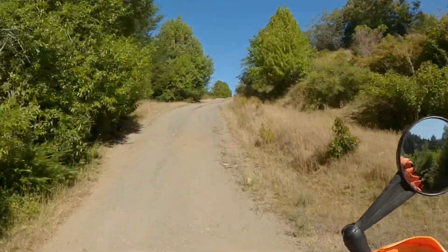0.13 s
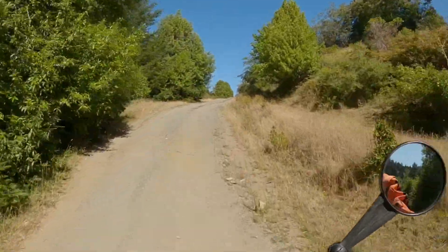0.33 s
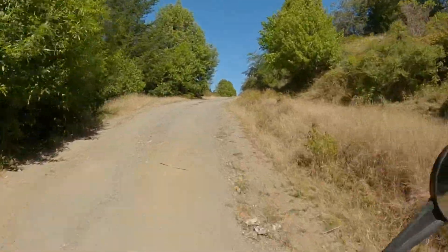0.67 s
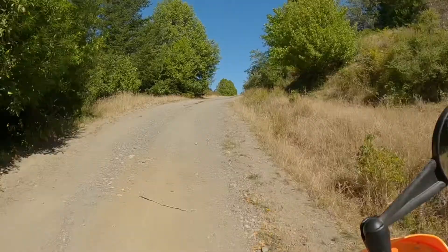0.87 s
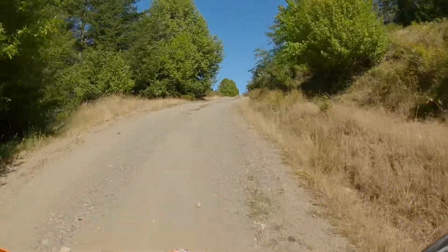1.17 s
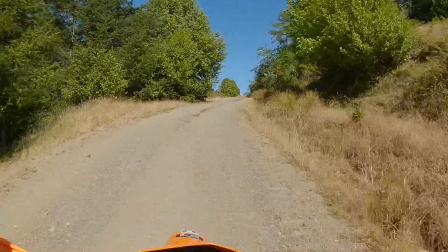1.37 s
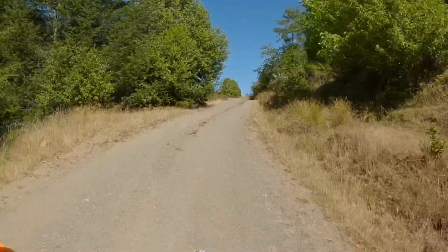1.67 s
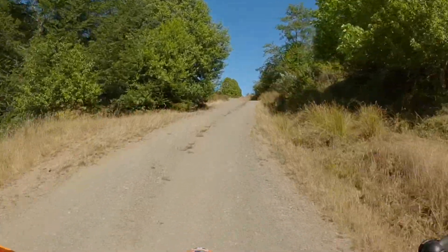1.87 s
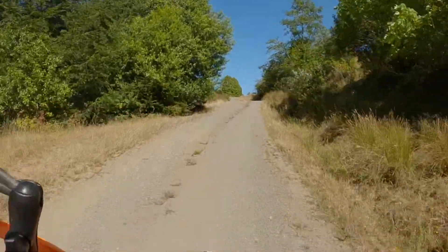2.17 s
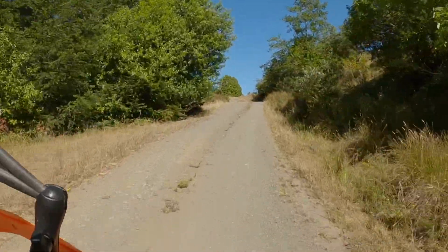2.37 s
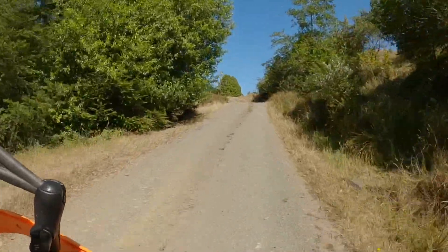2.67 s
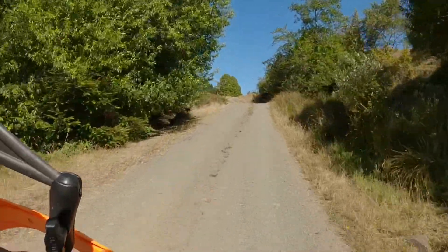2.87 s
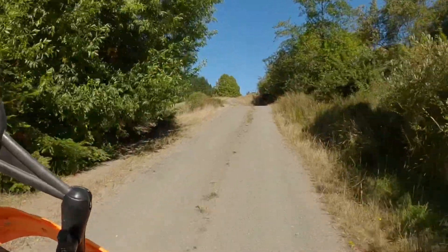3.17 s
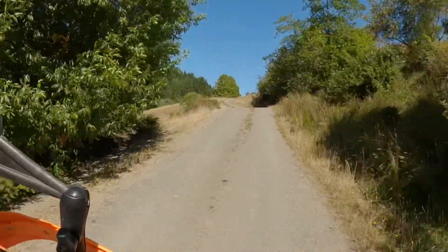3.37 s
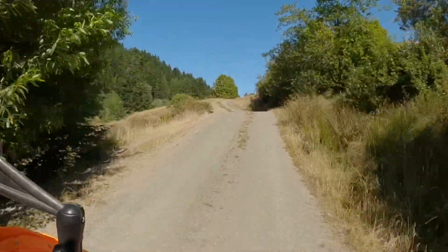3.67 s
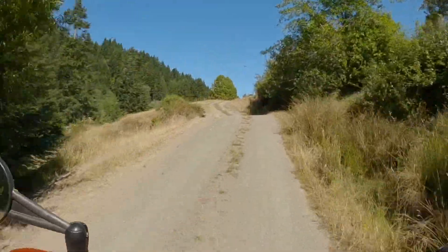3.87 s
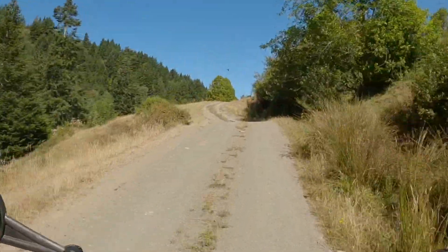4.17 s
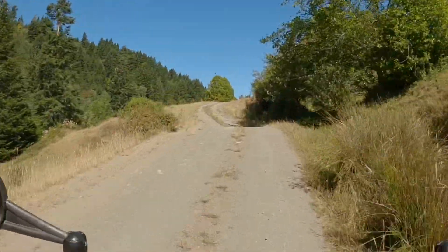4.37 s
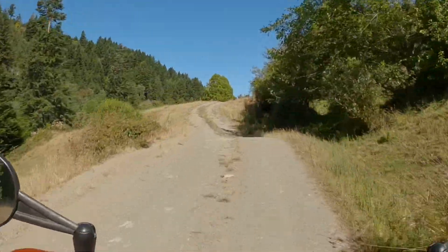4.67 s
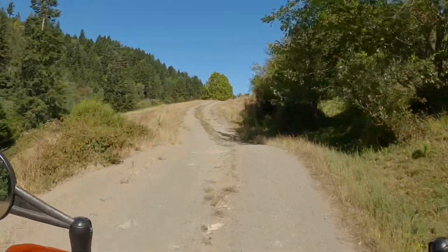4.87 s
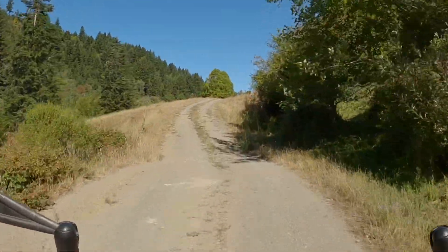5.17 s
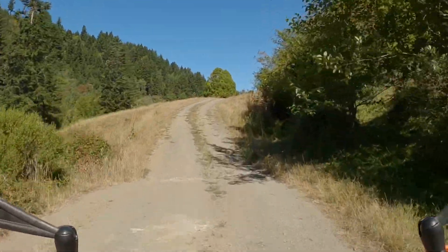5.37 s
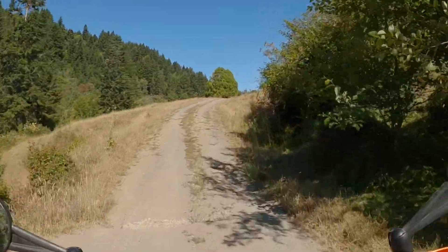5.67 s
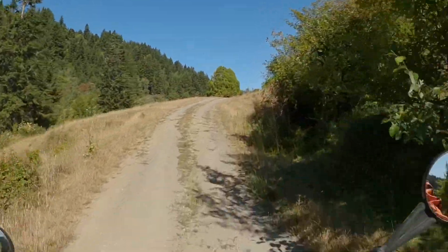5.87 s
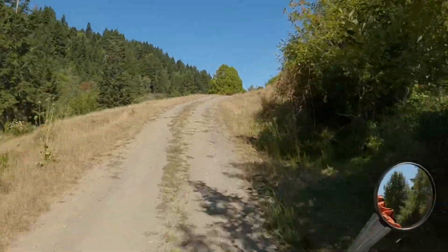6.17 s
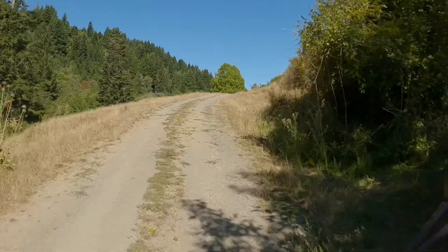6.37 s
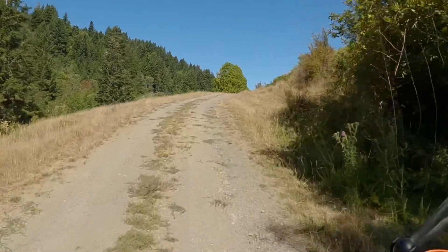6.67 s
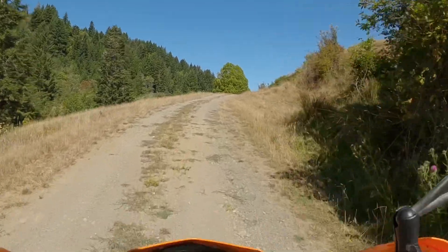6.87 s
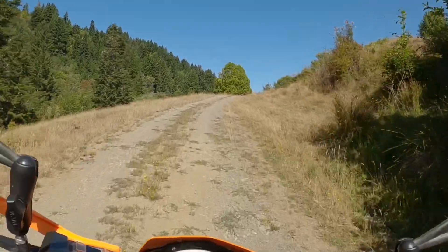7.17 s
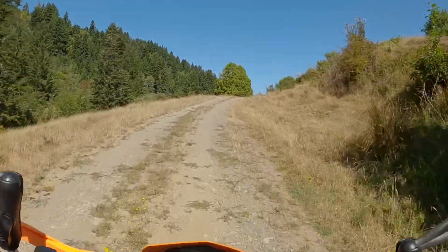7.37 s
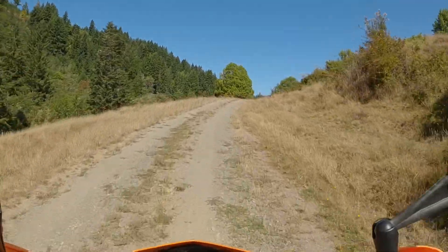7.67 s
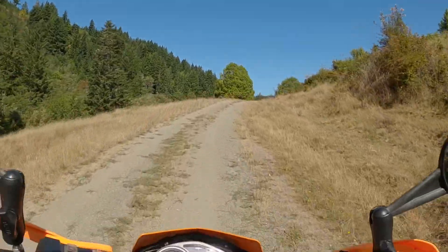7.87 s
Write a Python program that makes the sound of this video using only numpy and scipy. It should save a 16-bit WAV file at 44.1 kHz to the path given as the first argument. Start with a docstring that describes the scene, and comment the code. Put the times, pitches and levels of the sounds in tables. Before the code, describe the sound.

From inside a rider's helmet, a single-cylinder four-stroke motorcycle pulls up an open gravel track. The exhaust is a fast, low, hollow throb, about 36 beats a second, with soft puffs, a pipe-like ring and faint case rattle, valve hiss and tyre noise. Around 0.8 seconds stones click sharply against the frame and wind thumps low, buffeting again near 1.4. Revs waver, then climb from 2 seconds to about 52 beats at 3.5. At 3.8 the throttle shuts: pitch drops suddenly and the firing becomes boomy, ragged and slowing, with missed beats and pops near 4.3, 4.5 and 4.8. From 5.1 it pulls again, slower and deeper, about 30 beats a second. Two loud, hard pops burst close together at 6.25, with gravel spray and smaller cracks until 6.45. It then chugs steadily, gently rising to about 35 beats by 8 seconds, over rumbling wind.

```python
"""On a gravel track, from inside a rider's helmet, a single-cylinder four-stroke motorcycle climbs.
It pulls, drops to lower revs with ragged firing and pops, then pulls again. Each engine cycle pushes gas
into ringing pipes: a crack and bark, a low puff, and a fainter ring one crank turn later. Filtered noise makes
the rattling cases, valve gear, tyres and stones, the gas roar, and the wind rumbling below."""
import sys
import numpy as np
from scipy.fft import rfft, irfft, next_fast_len
from scipy.io import wavfile
from scipy.ndimage import uniform_filter1d, map_coordinates

SR = 44100
rng = np.random.default_rng(int(sys.argv[2]) if len(sys.argv) > 2 else 0)


def generate_wav(sig):
    """Save sig (samples, or channels by samples) to the path in sys.argv[1] as 16-bit PCM at SR."""
    pcm = np.round(np.clip(np.atleast_2d(sig).T, -1, 1) * 32767).astype(np.int16)
    wavfile.write(sys.argv[1], SR, pcm)


N = 353682
TIME = np.arange(N) / SR  # s


def amp(db):
    """Turn decibels into a plain multiplier."""
    return 10 ** (np.asarray(db) / 20)


def unit(x):
    """Scale a sound to rms 1."""
    return x / np.sqrt(np.mean(x ** 2) + 1e-20)


def steady(x):
    """Hold a sound near rms 1 all along, keeping its quick beat."""
    power = uniform_filter1d(x ** 2, size=SR // 6)
    return x / np.sqrt(np.abs(power) + 1e-12)


def curve(rows):
    """Join (time, value) points by straight lines, one value per sample."""
    seconds, values = np.transpose(rows)
    return np.interp(TIME, seconds, values)


def wobble(rate):
    """Draw a smooth random curve with this many random points a second."""
    points = rng.standard_normal(int(N * rate / SR) + 4)
    return map_coordinates(points, [TIME * rate])


def filtered(x, response):
    """Filter a sound by a response given as a function of frequency in Hz."""
    length = next_fast_len(N + SR // 2)
    hz = np.fft.rfftfreq(length, 1 / SR)
    return irfft(rfft(x, length) * response(hz), length)[:N]


def modes(table, f):
    """Add up resonances, each strongest at its own frequency."""
    return sum(amp(db) * 1j * f * width / (centre * centre - f * f + 1j * f * width)
               for centre, width, db in table)


def noise(points):
    """Colour random noise by a spectrum and scale it to rms 1."""
    f, db = np.transpose(points)

    def spectrum(hz):
        return amp(np.interp(np.log(hz + 1), np.log(f), db, left=-120))

    return unit(filtered(rng.standard_normal(N), spectrum))


def pulses(seconds, size):
    """Place single-sample pushes at the given times."""
    at = np.clip(np.round(np.asarray(seconds) * SR).astype(int), 0, N - 1)
    return np.bincount(at, size, N)


def blown(push, table, soft_hz):
    """Round off gas pushes and let them ring in a set of resonances."""
    return filtered(push, lambda f: np.exp(-.5 * (f / soft_hz) ** 2) * modes(table, f))


def shaken(gate, table):
    """A shaken part takes up and gives off sound best at its resonances, hence the square."""
    return unit(filtered(gate * rng.standard_normal(N), lambda f: modes(table, f) ** 2))


def knock(turn, share, length):
    """Start at 1 at one point of each cycle and die away; share and length are parts of a cycle."""
    return np.exp(-((turn - share) % 1) / length)


# How fast the engine fires: t/s, f/Hz (firings per second)
FIRING_RATE = [(0.0, 35.97), (0.5, 37.07), (0.75, 42.63), (0.875, 39.23), (1.0, 41.7), (1.25, 38.35),
               (1.375, 45.66), (1.625, 40.97), (1.875, 39.21), (2.0, 40.59), (2.25, 40.06), (3.0, 43.7),
               (3.25, 47.68), (3.375, 47.21), (3.5, 52.11), (3.81, 50.48), (3.875, 37.41), (4.0, 41.79),
               (4.125, 42.02), (5.125, 32.22), (5.25, 34.09), (5.5, 30.28), (6.0, 29.15), (6.125, 31.05),
               (6.25, 29.75), (6.375, 33.75), (6.625, 31.64), (6.75, 33.72), (6.875, 32.3), (8.0, 34.86)]


def firing_rate():
    """Firings per second; a four-stroke fires once in two crank turns."""
    return curve(FIRING_RATE)


SHUT_S, REOPENED_S, SWITCH_S = 3.82, 5.14, 0.019  # throttle shut, reopened; time to move it


def coasting():
    """1 while the throttle is shut, 0 under power."""
    inside = np.minimum(TIME - SHUT_S, REOPENED_S - TIME)
    return np.clip(inside / SWITCH_S + .5, 0, 1)


# How hard the engine fires: t/s, level/dB
EFFORT = [(0, -16.5), (.45, -16.5), (.9, -14.5), (1.0, -16), (1.2, -16), (1.4, -15), (1.65, -16),
          (2.0, -15), (3.3, -14), (3.81, -13.5), (3.83, -20), (3.95, -18), (4.6, -17.5), (4.85, -18),
          (5.18, -24), (5.36, -18.5), (5.48, -17.5), (5.62, -19), (5.96, -23), (6.2, -19), (6.27, -15.5),
          (6.36, -18), (6.41, -15.5), (6.43, -25), (6.48, -17), (6.5, -15), (6.6, -16), (7.2, -16),
          (8.02, -16)]
# How hard the machine shakes: t/s, level/dB
SHAKING = [(0.0, -43), (0.13, -48.5), (0.73, -40.5), (0.96, -47), (1.14, -44), (3.74, -47.5), (3.88, -59),
           (4.23, -53), (5.15, -46.5), (6.24, -38.5), (6.28, -43.5), (6.37, -40), (6.53, -45), (8.0, -46.5)]
# How each part's loudness follows the engine: level/dB at full effort, usual shaking and cruising revs,
# then change in dB per dB of effort, dB per dB of shaking, dB per octave of revs, and dB while coasting
LEVEL_LAWS = dict( bark=(-18, 1.63, 0, -8, -0.25), puff=(-25.5, 0.04, 0, -9, -1),
              hum=(-24, -0.37, 0, -2.3, 1.5), ring=(-30.5, 7.5, 1, 27.5, -15),
              boom=(-28.5, 2.13, 1.5, -13.5, 10), crack=(-34, 2.8, 0.5, -5.5, 4),
              edge=(-36.5, 3.2, 0.5, 4, -2.5), cases=(-42.5, 0.02, 0.36, -2, 0.3),
              rattle=(-47, 0, 0.6, 3, 0.9), roar=(-32, 0.75, .5, -4.1, 0.8),
              hiss=(-61.5, 0.1, 0.4, 1.5, 1.1), bell=(-50, -0.2, .9, -2.5, 3.2))
FULL_DB, USUAL_DB, CRUISE_HZ = -15, -47, 40  # effort, shaking and firing rate the laws start from


def level_db(part):
    """Work out a part's level from effort, shaking, revs and throttle."""
    base_db, per_effort, per_shaking, per_octave, coast_db = LEVEL_LAWS[part]
    effort_db = per_effort * (curve(EFFORT) - FULL_DB)
    shaking_db = per_shaking * (curve(SHAKING) - USUAL_DB)
    revs_db = per_octave * np.log2(firing_rate() / CRUISE_HZ)
    return base_db + effort_db + shaking_db + revs_db + coast_db * coasting()


# Colour of the wind noise before scaling: f/Hz, level/dB
WIND_COLOUR = [(6, -20), (12, 0), (25, -6), (60, -18), (150, -30), (300, -120)]
# Gusts and lulls: t/s, level/dB (change at the middle)
BLASTS = [(.78, 10), (1.4, 12), (2.1, 4), (3.62, -12), (4.2, 3), (6.4, 7), (7.62, 5)]
WIND_DB, GUST_S = -31, .08  # level without gusts; half length of a gust


def wind():
    """Lumpy low air noise buffets the microphone, with gusts and lulls."""
    gust_db = sum(db * np.exp(-.5 * ((TIME - s) / GUST_S) ** 2) for s, db in BLASTS)
    buffeting = unit(amp(5.5 * wobble(5.6)) * noise(WIND_COLOUR))
    return amp(WIND_DB + gust_db) * buffeting


# Gravel, single stones and sprays: t/s, level/dB (before a small cut and the frame's ring), length/s
STONES = [(0.7906, -34, 0.0035), (0.801, -32.5, 0.0024), (0.8052, -26, 0.0028), (1.373, -40, 0.0025),
          (6.273, -43, .045), (6.374, -39, 0.0028), (6.384, -47.5, 0.016), (6.446, -45, .008)]
# Ringing of the frame: f/Hz, width/Hz, level/dB
FRAME = [(4800, 1200, 1), (6430, 1200, 3.5), (9070, 970, -3), (11900, 1200, -3.5)]


def gravel():
    """Stones hit the frame: sudden noise bursts ring in the metal."""
    gate = 0
    for s, db, length in STONES:
        fade = np.clip(1 - (np.abs(TIME - s) / length) ** 2, 0, 1)
        gate = gate + amp(db - 1.5) * (TIME >= s) * fade
    return filtered(gate * rng.standard_normal(N), lambda f: (modes(FRAME, f) + 1.0) * f / (f + 3000))


# Colour of the gas-flow noise before scaling: f/Hz, level/dB (per Hz)
ROAR = [(60, -42), (120, -7.5), (250, -2.5), (400, -2), (550, -8.5), (800, -32), (2000, -100)]


def roar():
    """Turbulent gas flowing through the pipe gives a slowly wavering low noise."""
    return amp(level_db('roar')) * unit(amp(2.1 * wobble(7)) * noise(ROAR))


# Ringing of loose parts: f/Hz, width/Hz, level/dB
LOOSE = [(2510, 210, -3.5), (2814, 290, 2), (3052, 200, 1), (3313, 270, 1.5), (3675, 570, -2),
         (4190, 200, 0.5), (4620, 100, -13)]
# Colour of the broad rattle before scaling: f/Hz, level/dB (per Hz)
RATTLE = [(2000, -39), (2500, -1), (4500, -8.5), (5500, -16), (7500, -18), (13000, -27), (15700, -48.5)]


def rattle():
    """Loose parts and tyres shake unevenly: ringing noise over broad noise."""
    loose = shaken(amp(1.2 * wobble(11) + 3.0 * wobble(120)), LOOSE)
    broad = 1.01 * amp(0.28 * wobble(17)) * noise(RATTLE)
    return amp(level_db('rattle')) * unit(loose + broad)


# Ringing of the engine cases: f/Hz, width/Hz, level/dB
CASES = [(942, 310, -1.5), (1475, 476, -2.5), (1948, 59, -10.5)]


def cases(turn):
    """The cases ring to noise that swells twice a cycle, once each crank turn."""
    twice = 1 + 0.2 * np.cos(4 * np.pi * turn - 1.9)
    return amp(level_db('cases')) * shaken(twice * amp(1.6 * wobble(90)), CASES)


# Narrow, bell-like ringing: f/Hz, width/Hz, level/dB
BELL = [(1425, 38, 4), (1890, 54, 0)]


def bell(turn):
    """Metal rings narrowly, struck by noise at two points half a cycle apart."""
    gate = 1.2 + knock(turn, .12, .15) + knock(turn, .62, .15)
    return amp(level_db('bell')) * shaken(gate, BELL)


# Ringing of the tappet: f/Hz, width/Hz, level/dB
TAPPET = [(5294, 180, 6), (5855, 310, 4.5), (6550, 51, -11), (7640, 300, -15.5)]
# When the tappet knocks: t/s, share of the cycle
TAPPET_TURN = [(0, 0.48), (4.3, 0.23), (5.3, 0.84), (5.6, 1), (8.02, 0.52)]
# How loud the tappet is: t/s, level/dB
TAPPET_LEVEL = [(0.0, -63.5), (2.6, -66.5), (3.74, -62.5), (3.94, -71), (4.72, -57.5), (5.17, -74),
                (5.9, -51.5), (6.11, -65), (7.84, -58.5), (8.0, -71)]


def tappet(turn):
    """The tappet knocks once a cycle, each knock a fading burst of ringing noise."""
    gate = 0.43 + knock(turn, curve(TAPPET_TURN), 0.12)
    return amp(curve(TAPPET_LEVEL)) * shaken(gate, TAPPET)


# Ringing of the high hiss: f/Hz, width/Hz, level/dB
HISS = [(6900, 2000, -1.2), (8840, 500, -0.5), (10170, 1100, -0.84), (11600, 500, -1), (13200, 1100, 0.5),
        (14000, 1100, -5.5)]
# Valve gear contacts: share of the cycle, level/dB
TICK_TURNS = [(0.201, 12), (0.441, 2)]


def hiss(turn):
    """The valve gear hisses more at each contact, softened by oil."""
    ticks = .6 + sum(amp(db) * knock(turn, share, 0.19) for share, db in TICK_TURNS)
    ticks = uniform_filter1d(ticks, size=SR // 160)  # oil cushions each contact
    return amp(level_db('hiss')) * shaken(ticks * amp(1.4 * wobble(40)), HISS)


def machinery(turn):
    """Add the mechanical noises that follow shaking and the engine cycle."""
    return cases(turn) + bell(turn) + rattle() + tappet(turn) + hiss(turn)


# Sharp firings: t/s, level/dB (peak aimed for)
POPS = [(4.308, -17), (4.49, -21), (4.811, -23), (4.9, -26), (6.248, -9.5), (6.282, -6), (6.372, -32),
        (6.407, -28)]


def pops():
    """Late-burning fuel gives a push with a hard, bright front."""
    seconds, db = np.transpose(POPS)
    push = pulses(seconds, amp(db + 27))  # the filter below lowers the peak
    return -blown(push, [(676, 230, 7), (270, 52, 0), (950, 200, -6)], soft_hz=800)  # Hz, width Hz, dB


HOT_FROM_HZ, HOT_FULL_HZ = 35, 49  # firing rates where the pipe starts and finishes heating


def heat():
    """Heat of the muffler, 0 to 1: higher at high revs, none while coasting."""
    share = (firing_rate() - HOT_FROM_HZ) / (HOT_FULL_HZ - HOT_FROM_HZ)
    return np.clip(share, 0, 1) * (1 - coasting())


# Ringing of the muffler: f/Hz, width/Hz, level/dB
MUFFLER = [(275.2, 67.8, 3)]
# The same with hotter gas, which rings higher: f/Hz, width/Hz, level/dB
HOT_MUFFLER = [(295, 60.3, 2.9)]


def muffled(push, soft_hz):
    """Gas pushes ring the muffler, moving to its hot pitch with heat."""
    cool = (1 - heat()) * blown(push, MUFFLER, soft_hz)
    hot = heat() * blown(push, HOT_MUFFLER, soft_hz)
    return -cool - hot


# Weak and strong firings while coasting: t/s, level/dB (change)
MISFIRES = [(4.17, -13.5), (4.312, 6.5), (4.49, -3), (4.54, -7), (4.625, -7), (4.73, -7), (4.845, -11),
            (4.935, -5.5), (4.99, -3), (5.05, -6), (5.085, 5)]
STEADY_DB, RAGGED_DB = .42, 2.6  # size scatter under power; scatter added by the end of the coast
MS_PER_DB = .3  # time scatter per dB of size scatter
LATE_BURN = 0.21  # share of a weak firing's loss that its puff gains


def firings(turn):
    """One firing per cycle, a little off in time and size: even times, actual times, strength by part."""
    coast = coasting()
    thinning = coast * (np.cumsum(coast) / coast.sum()) ** 2  # the mixture thins out
    even = np.interp(np.arange(int(turn[-1]) + 1), turn, TIME)
    scatter_db = (STEADY_DB + RAGGED_DB * thinning)[(even * SR).astype(int)]
    fire = even + MS_PER_DB * scatter_db * rng.standard_normal(len(even)) / 1000
    missed_db = sum(db * (np.abs(even - s) < .012) for s, db in MISFIRES)
    strength = {part: amp(scatter_db * rng.standard_normal(len(even)) + missed_db)
                for part in 'bark boom puff ring crack edge'.split()}
    strength['puff'] *= amp(-(1 + LATE_BURN) * missed_db)
    return even, fire, strength


# Ringing of the header pipe: f/Hz, width/Hz, level/dB
HEADER = [(453, 210, 0)]
# The header pipe under a hard pull: f/Hz, width/Hz, level/dB
HOT_HEADER = [(493, 150, -2), (591, 120, 0.5)]
HEADER_HEATS = 2.4  # the header pipe warms this much sooner than the muffler


def crack(opening, fire, strength):
    """The opening valve's crack rings the header pipe, and the pipe end sends it back."""
    back = pulses(fire + 0.003234, 0.88 * strength['edge'])

    def pipe(table):
        return steady(filtered(back - opening, lambda f: modes(table, f) ** 2 / (1 + (f / 640) ** 8)))

    glowing = np.clip(HEADER_HEATS * heat(), 0, 1)
    ringing = (1 - glowing) * pipe(HEADER) + glowing * pipe(HOT_HEADER)
    return amp(level_db('crack')) * ringing


# Ringing of the crack's bright edge: f/Hz, width/Hz, level/dB
EDGE = [(924, 220, 7.5), (1153, 270, -0.43)]


def edge(opening):
    """The crack's bright edge: a sharp push plus a fading jet of gas noise."""
    jet = np.abs(filtered(opening, lambda f: 1 / (1 + 1j * f / 14))) * rng.standard_normal(N)
    sharp = (firing_rate() / 42) ** 1.8  # at higher revs the valve snaps open faster
    source = sharp * unit(opening) + .6 * unit(jet)
    return amp(level_db('edge')) * steady(filtered(source, lambda f: modes(EDGE, f) ** 2))


# Ringing of the low boom: f/Hz, width/Hz, level/dB
BOOM = [(142.5, 67.6, 0.0092)]
# Ringing of the low puff: f/Hz, width/Hz, level/dB
PUFF = [(82, 107.5, 0.0023)]
PUFF_SHARE, COAST_PUFF_MS = 0.2234, 2.47  # puff delay: share of a cycle under power; ms while coasting
RING_TOP_DB = -27.5  # the second ring grows no further


def exhaust(turn):
    """Each cycle's gas pushes sound the bark, boom, puff, ring, crack and edge, over a steady hum."""
    even, fire, strength = firings(turn)
    at = (even * SR).astype(int)

    def push(part, seconds, top_db=np.inf):
        level = amp(np.minimum(level_db(part), top_db)[at])
        return pulses(seconds, SR / 40 * level * strength[part])  # spread over a cycle at 40 Hz

    bark = muffled(push('bark', fire), soft_hz=254.3)
    boom = -blown(push('boom', fire), BOOM, soft_hz=278)
    coast = coasting()
    delay_ms = (1 - coast) * 1000 * PUFF_SHARE / firing_rate() + coast * COAST_PUFF_MS
    puff = blown(push('puff', fire + delay_ms[at] / 1000), PUFF, soft_hz=234)
    # about one crank turn later the rising piston rings the muffler again
    later = np.interp(np.arange(len(even)) + 0.5248, turn, TIME)
    ring = muffled(push('ring', later, RING_TOP_DB), soft_hz=217)
    hum = np.sqrt(2) * amp(level_db('hum')) * np.cos(2 * np.pi * (2 * turn - .51))
    opening = pulses(fire - .0032, strength['crack'])  # the valve opens just ahead of the bark
    return bark + boom + puff + ring + hum + crack(opening, fire, strength) + edge(opening)


FIRST_TURN = .197  # share of a cycle before the first firing


def scene():
    """Add all the layers, driven by one count of engine cycles."""
    turn = np.cumsum(firing_rate()) / SR - FIRST_TURN
    return (wind() + gravel() + roar() + machinery(turn) + pops() + exhaust(turn))[None]


CEILING, TOP_HZ = .95, 15750  # highest peak (full scale 1); band limit


def record(dry):
    """The input rounds off the highest peaks, dulls the top octave and keeps nothing above its band limit."""
    rounded = dry[0] / (1 + np.abs(dry[0] / CEILING) ** 10) ** .1
    return filtered(rounded, lambda hz: (hz < TOP_HZ) / (1 + (hz / 15000) ** 20))[None]


dry = scene()
out = record(dry)
generate_wav(out)
```